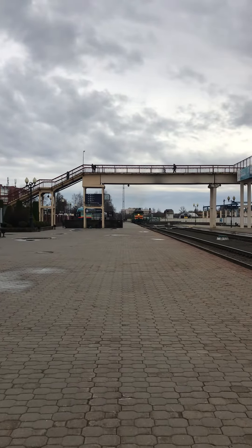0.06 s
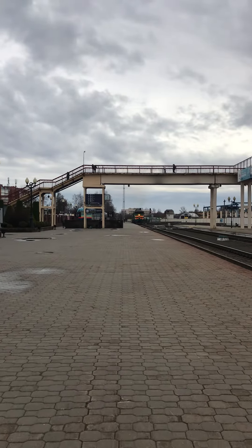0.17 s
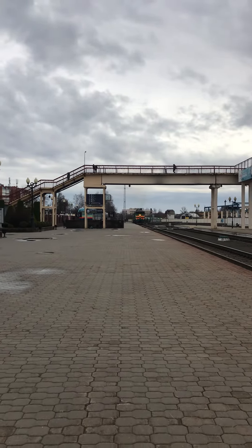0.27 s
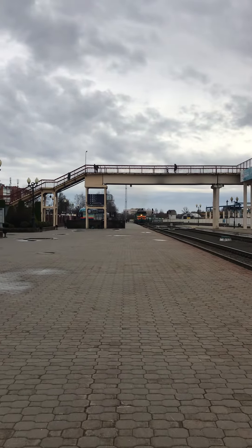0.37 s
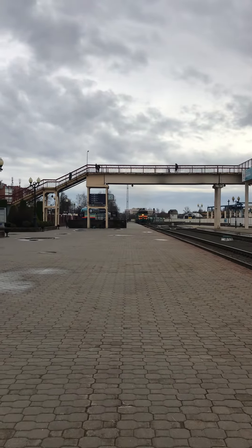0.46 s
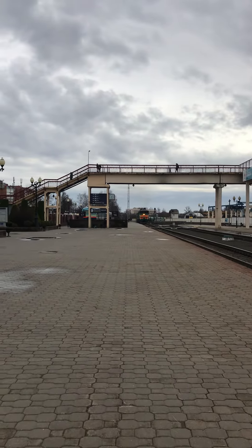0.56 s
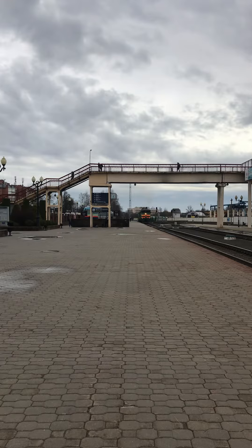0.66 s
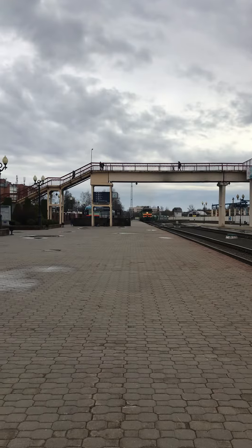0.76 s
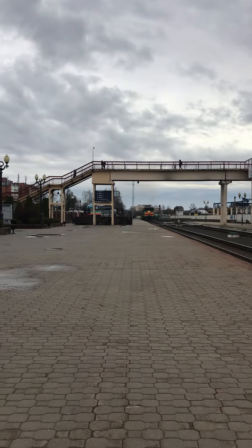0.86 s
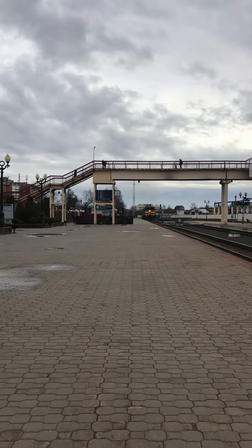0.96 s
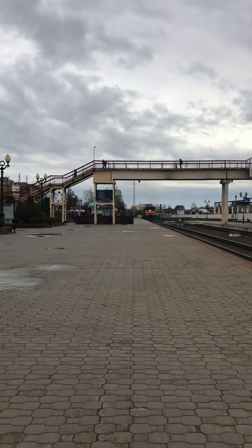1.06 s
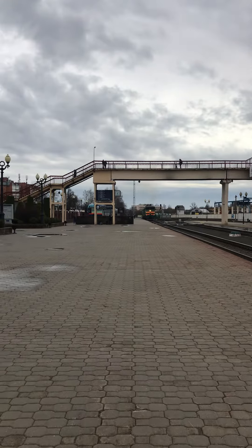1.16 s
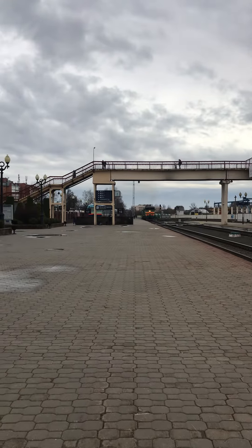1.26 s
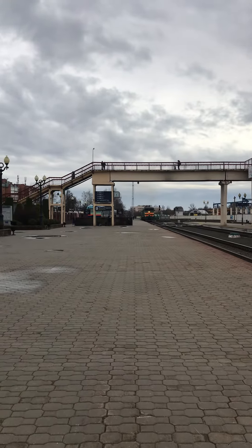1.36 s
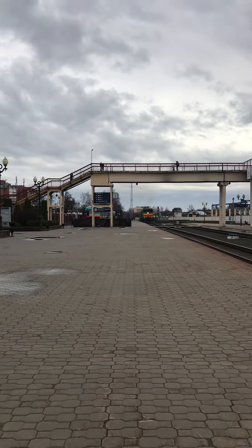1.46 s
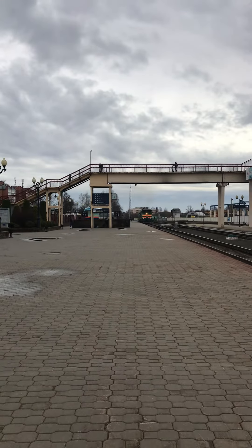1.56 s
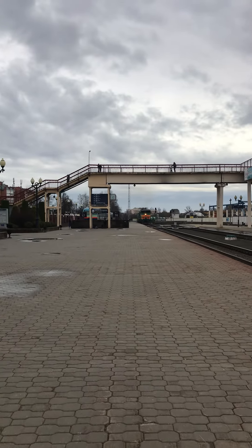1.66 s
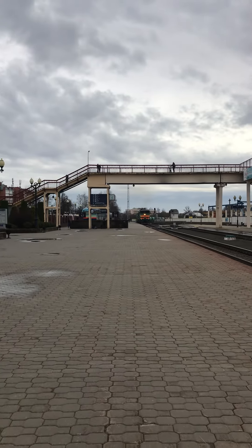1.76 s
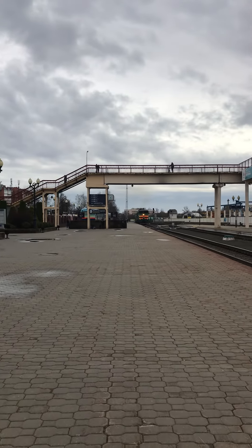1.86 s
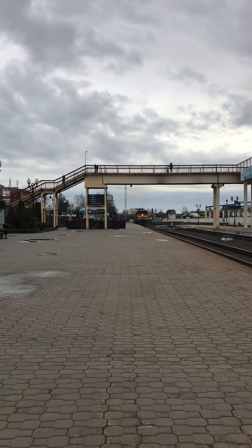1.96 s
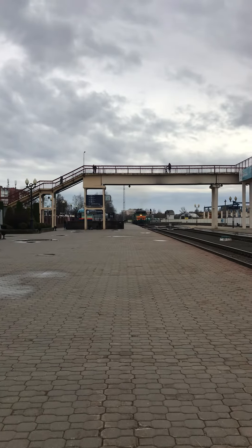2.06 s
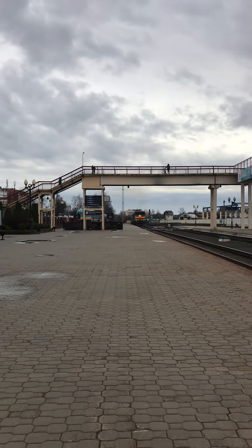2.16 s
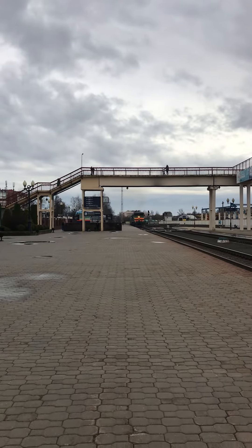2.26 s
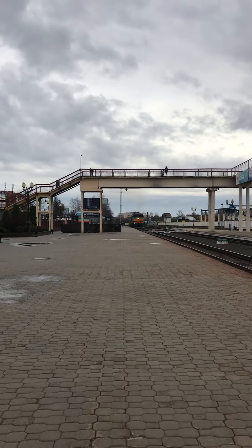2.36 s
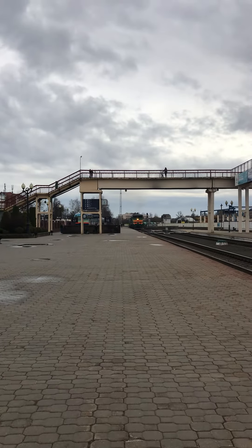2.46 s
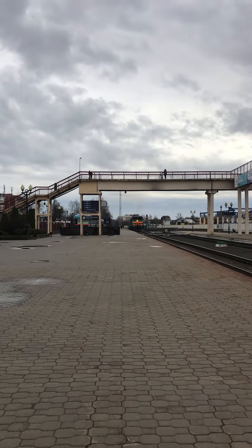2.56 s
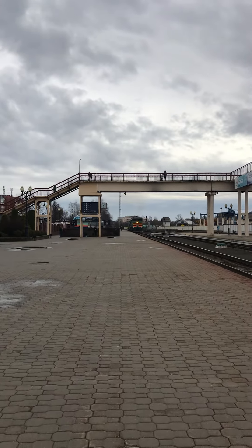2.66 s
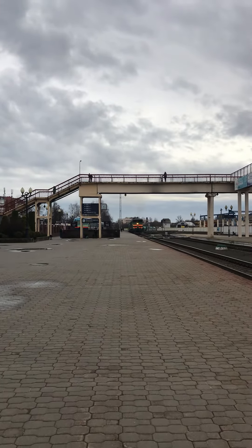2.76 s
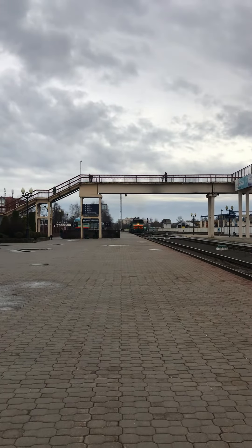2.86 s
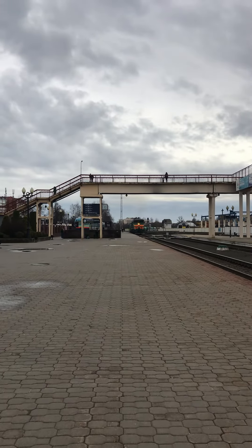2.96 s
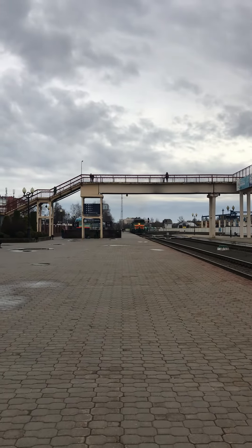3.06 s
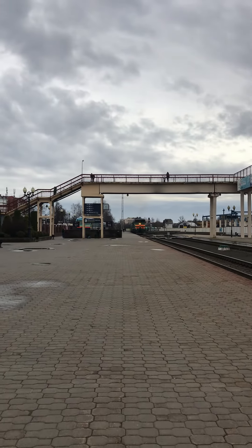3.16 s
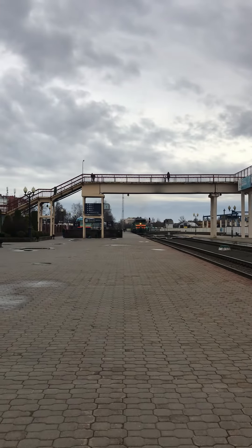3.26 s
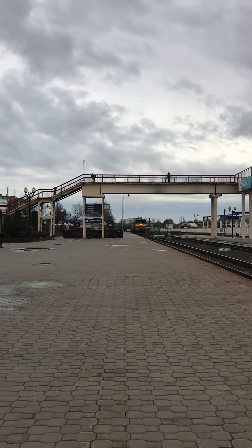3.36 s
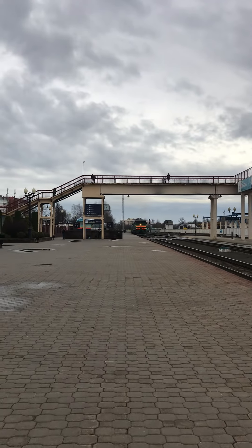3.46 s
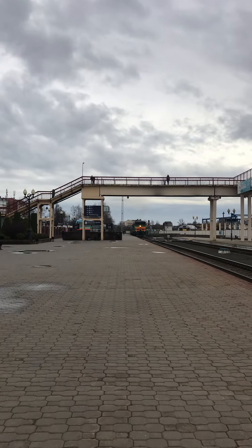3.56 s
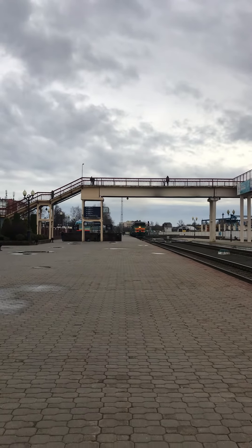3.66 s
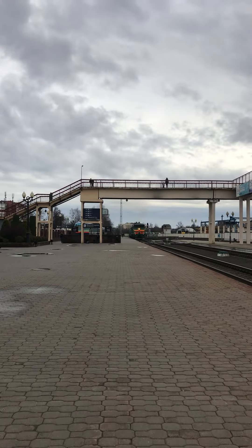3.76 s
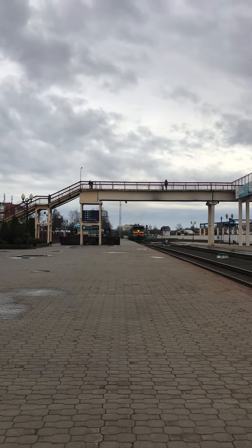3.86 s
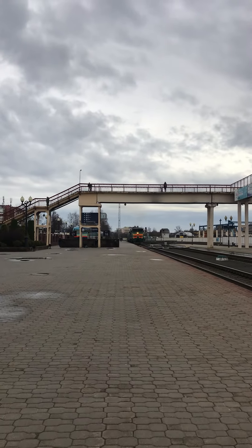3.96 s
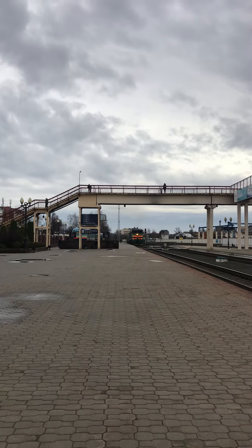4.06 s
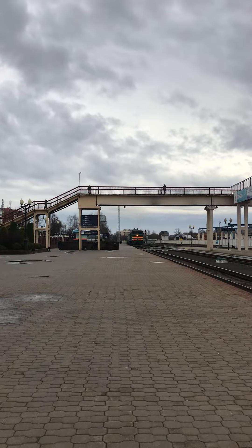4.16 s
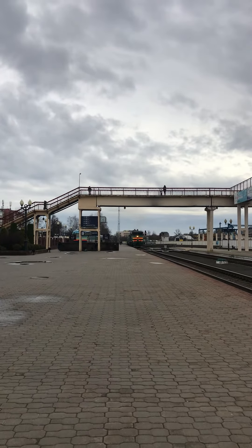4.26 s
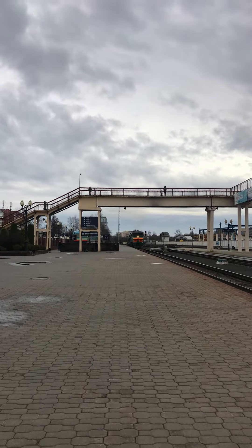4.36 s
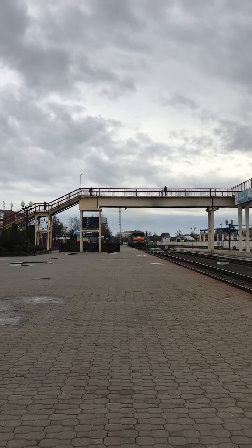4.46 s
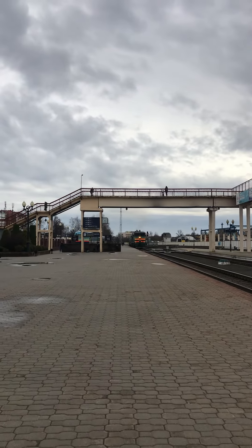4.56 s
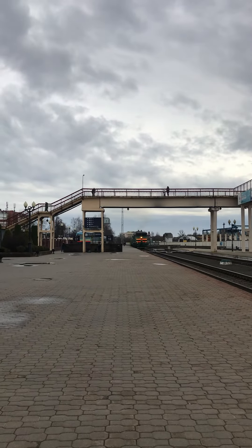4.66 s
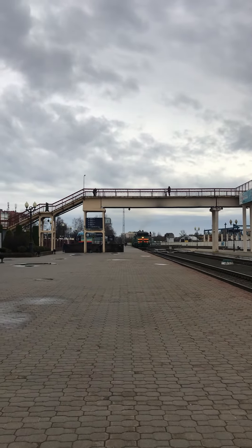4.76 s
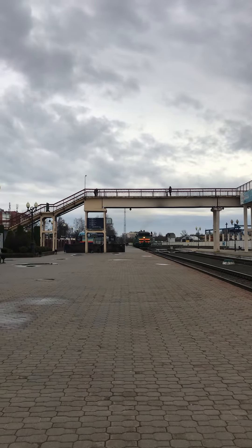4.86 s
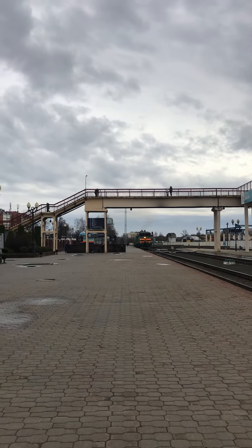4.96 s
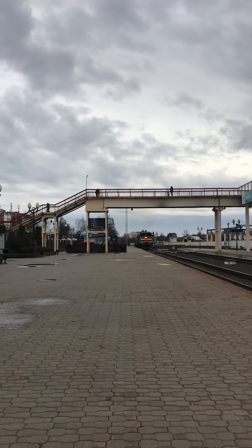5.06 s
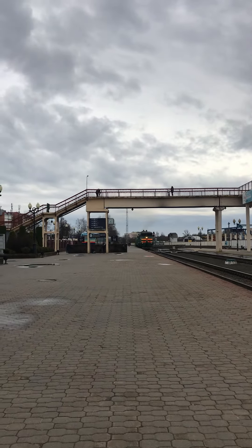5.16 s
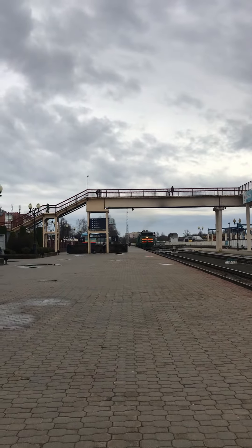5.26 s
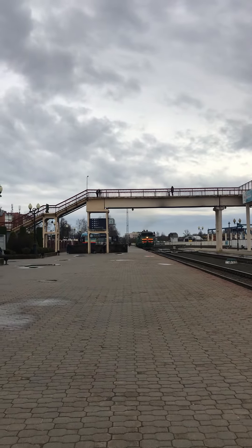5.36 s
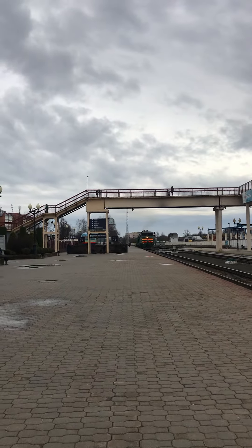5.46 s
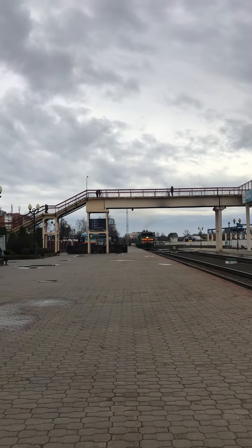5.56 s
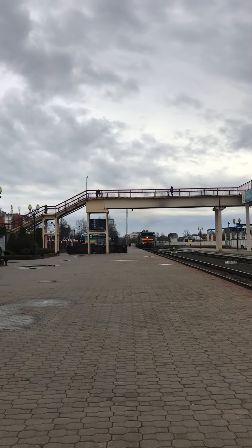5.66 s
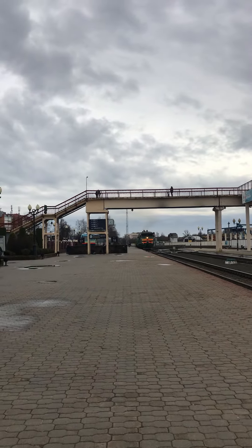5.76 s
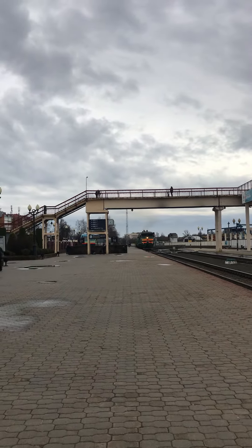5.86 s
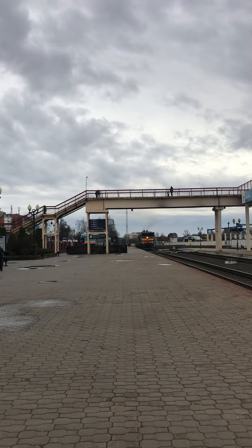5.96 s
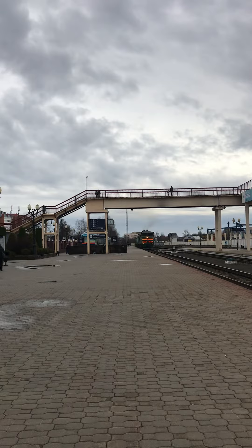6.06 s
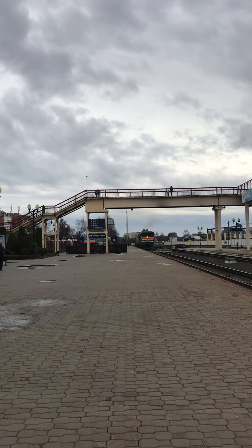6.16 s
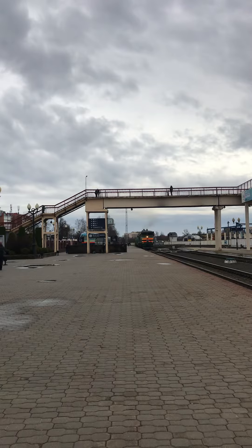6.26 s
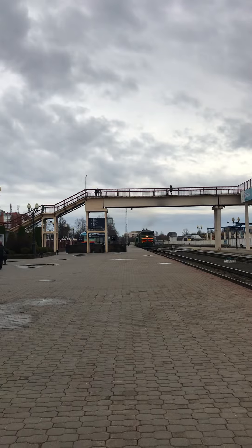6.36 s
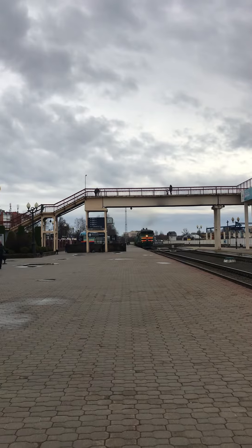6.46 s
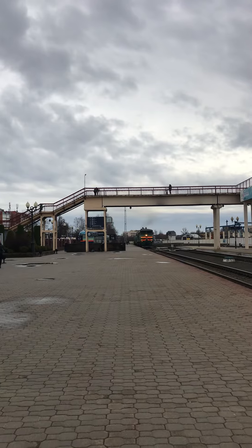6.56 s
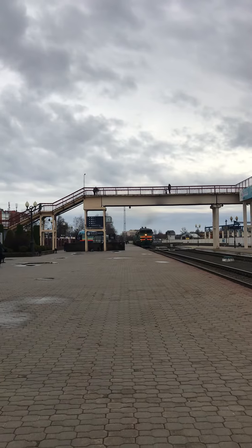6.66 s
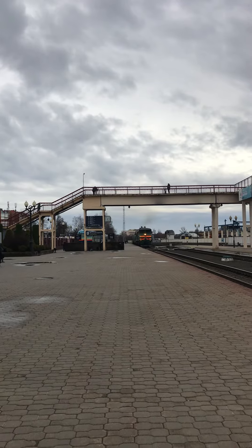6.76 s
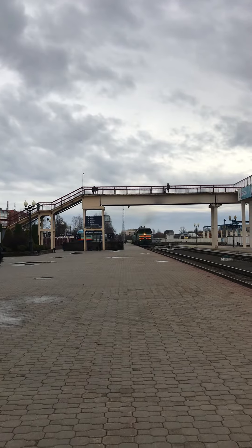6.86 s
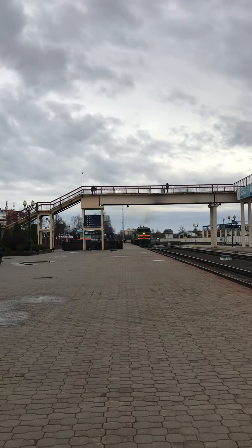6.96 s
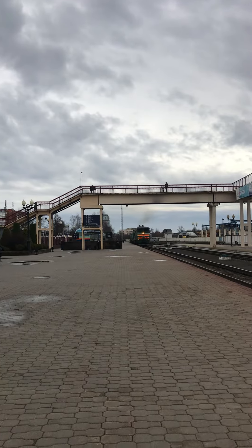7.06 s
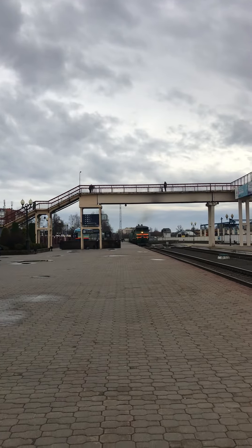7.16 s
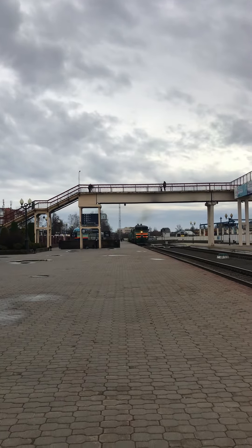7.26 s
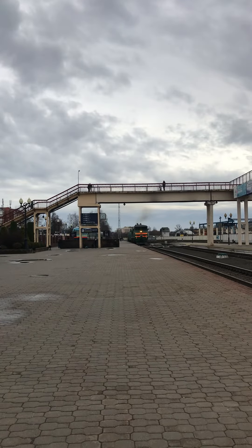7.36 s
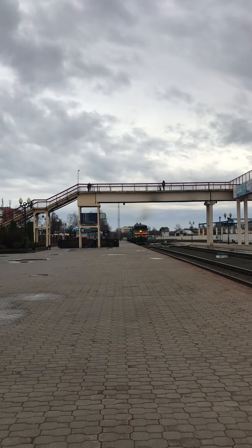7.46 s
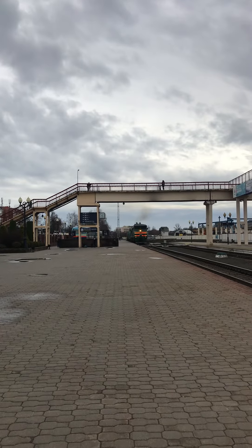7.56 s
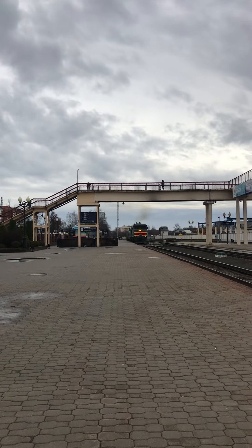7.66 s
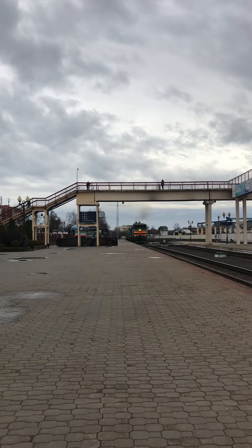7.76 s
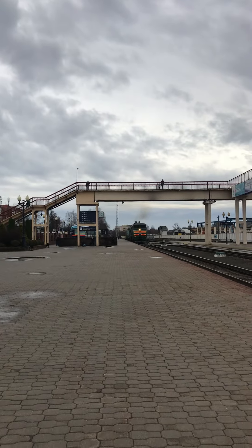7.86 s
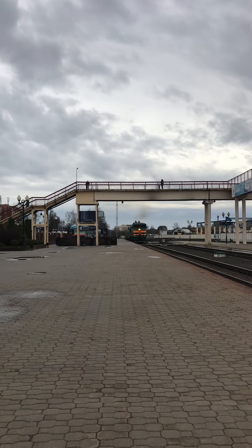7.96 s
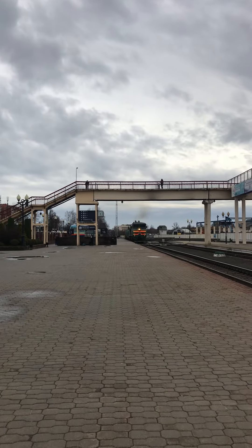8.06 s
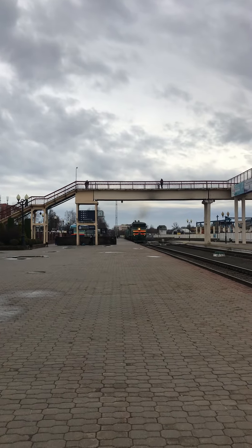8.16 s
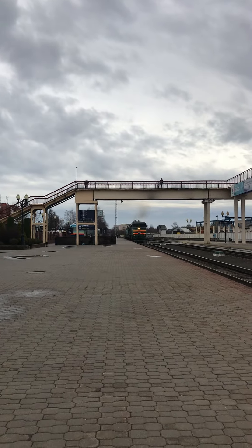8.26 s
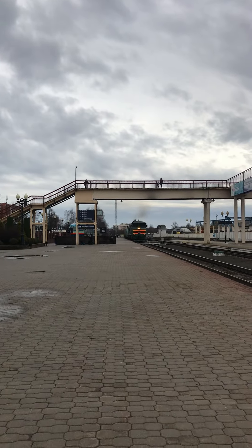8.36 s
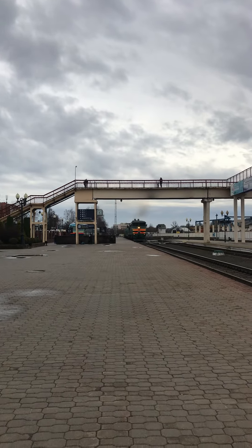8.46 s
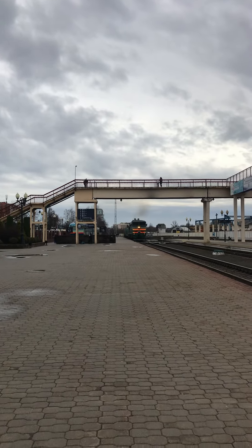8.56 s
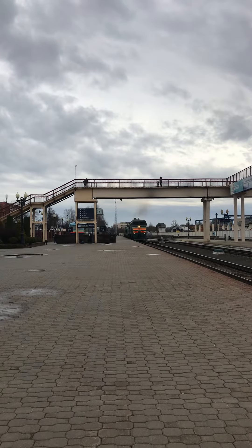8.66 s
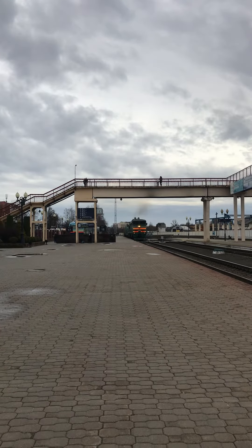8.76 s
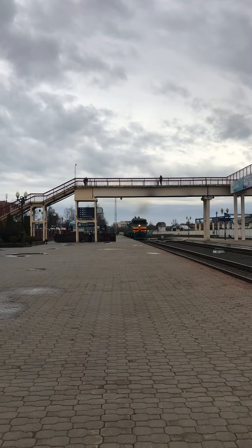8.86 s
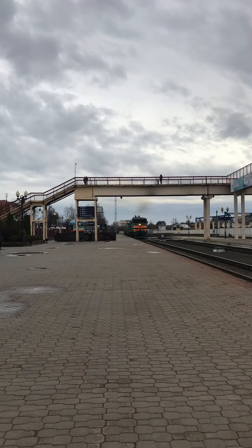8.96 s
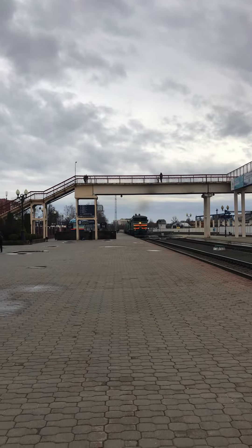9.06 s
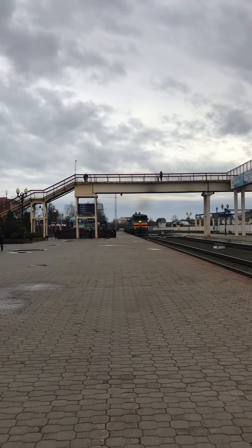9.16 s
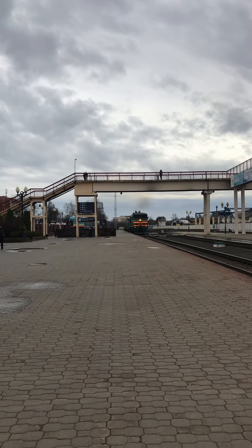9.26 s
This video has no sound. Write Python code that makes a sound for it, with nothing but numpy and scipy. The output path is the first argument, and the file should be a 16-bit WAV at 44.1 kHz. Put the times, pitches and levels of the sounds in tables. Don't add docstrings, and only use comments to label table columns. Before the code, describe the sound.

An open-air station platform, heard through a handheld phone microphone. From 0 s a distant diesel locomotive gives a deep, throbbing drone, two engines slightly out of step so the low rumble beats, beneath a soft broad roar of exhaust, fans and wheels. The rumble swells around 3 s and again near 6 s, and thin blower and gear whines slowly strengthen. Very close, coat fabric swishes, with small dry crackles early on, a longer shift around 2-3 s, and sharper crackles clustering from 3.6 to 6 s. At about 6.9 s a loud, brassy air horn enters: short blasts at 6.9-7.2 and 7.4-7.7, a longer one at 7.9-8.6, and a last from 8.8 to about 9.4 s. Its steady mid pitch shimmers, each blast leaving a quickly fading echo over the continuing engine roar and light cloth rubs.

```python
import sys
import numpy as np
from scipy import signal
from scipy.fft import rfft, irfft, next_fast_len
from scipy.io import wavfile
from scipy.ndimage import uniform_filter1d

SR = 44100
rng = np.random.default_rng(int(sys.argv[2]) if len(sys.argv) > 2 else 0)


def attenuation_scalar(level_db):
    decades = np.asarray(level_db, float) / 20
    return 10 ** decades


def store_wav(level_fs):
    pcm = np.round(np.clip(np.atleast_2d(level_fs), -1, 1) * 32767)
    wavfile.write(sys.argv[1], SR, pcm.T.astype(np.int16))


N = 410571
TIME = np.arange(N) / SR

# (frequency [Hz], level per Hz [dB])
ROAR_COLOUR = [(18, -60), (28, -29), (45, -17), (80, -6.5), (130, -16), (190, -12.5), (235, -26.5),
               (300, -19.5), (450, -30), (1360, -33.5), (2970, -40.5), (3900, -45), (4700, -52),
               (6000, -53.5), (8000, -65), (11000, -89)]
# (far level [dB], near level [dB]); the train sounds nearest from NEAR_S on
BASS_DB, MIDDLE_DB, TREBLE_DB = (-40, -30), (-43.3, -37.5), (-51.8, -44.8)
NEAR_S, HORN_DUCK_DB = 6.93, -2
# (middle [s], level [dB], half length [s])
RUMBLE_SURGES = [
    (3, 3.5, .5),
    (6, 2, 0.48),
    (6.8, -4.5, 0.38),
]

# (frequency [Hz], width [Hz], far level [dB], near level [dB])
WHINES = [(1353, 12, -60, -57), (3306, 130, -62, -56), (3450, 130, -65, -59), (5840, 800, -66, -59)]
# (far level [dB], near level [dB])
BLOWER_DB = (-69.5, -59)
BLOWER_HZ, BLOWER_WIDTH_HZ = 5200, 260
# (middle [s], level [dB], half length [s])
BLOWER_SWELLS = [
    (3.9, 4, .3),
    (4.9, 2.5, .6),
    (5.75, -6, .15),
    (6.1, 5, .25),
]

# (frequency [Hz], level [dB])
CLOTH_COLOUR = [(2940, -31), (5000, -3), (5830, -3), (6640, -6.5), (9200, -6), (10300, -6.5), (11400, -6.5),
                (12800, -8.5), (15100, -9.5), (15800, -6.5)]
# (time [s], peak level [dB], low band against high [dB], half length [s])
CREASES = [(0.0932, -42.5, -1, 0.0073), (0.3726, -47, 0.5, 0.0088), (0.4055, -47.5, 6, 0.008),
           (0.6235, -51, -8, 0.008), (0.9433, -46, -12, 0.0072), (1.068, -50, -8, 0.0065),
           (2.4634, -33, -12, 0.008), (3.0614, -43.5, -8, 0.008), (3.6077, -34.5, -15, 0.0073),
           (4.158, -30, -5, 0.0078), (4.756, -33.5, -1, 0.0075), (4.8688, -43.5, -8, 0.008),
           (4.9746, -38, -4, 0.008), (5.035, -42, 2, 0.0086), (5.0637, -37, 6, 0.0095),
           (5.241, -31, -19, 0.0022), (5.326, -30, -14, 0.0072), (5.828, -40, 6, 0.003),
           (5.835, -37, 13, 0.006), (5.8494, -36, -8, 0.0062), (5.8585, -33, -17, 0.001),
           (5.882, -30.5, -4, 0.0064), (5.893, -38, -15, 0.004), (4.844, -40, -15, .001),
           (6.0457, -37, -9, 0.008), (6.4896, -46, -3, 0.008), (6.6223, -45, -16, 0.008),
           (6.6947, -43, -4, 0.0071)]
# (time [s], peak level [dB], frequency [Hz])
SQUEAKS = [(2.8145, -51, 13200), (3.1128, -57, 13200), (3.1443, -60, 13200), (6.1804, -52, 13200)]
# (middle [s], level [dB], half length [s])
RUBS = [(.18, -67, 0.018), (0.716, -68, 0.033), (1.03, -68, .02), (1.17, -68, .03), (1.747, -63, .04),
        (1.86, -60, 0.045), (2.12, -63.5, 0.035), (2.62, -65, .05), (2.77, -63, 0.026), (2.898, -63, 0.027),
        (3.182, -63, 0.035), (3.422, -58, 0.024), (3.693, -65, 0.048), (4.27, -62, .02),
        (4.392, -60, 0.025), (4.549, -60, .04), (4.934, -63, .04), (5.084, -55, .03), (5.78, -61.5, 0.034),
        (6.523, -62, 0.026), (7.085, -43, .012), (7.205, -50, 0.01), (7.652, -41, .01), (7.767, -53, .02),
        (8.25, -52, .03), (8.378, -48, .015), (8.582, -57, .03), (8.848, -49, .015), (9.07, -54, .02)]
# (middle [s], level [dB], half length [s])
ARM_STIRS = [
    (.5, -3, .3),
    (2.4, 8.5, .7),
    (4.4, 2.5, .2),
    (4.96, 8, .15),
    (5.95, 8.5, 0.17),
    (6.9, 2, 0.54),
]
SWISH_DB, CREASE_LEAD_S = -67.5, 0.004

# (opens [s], shuts [s])
BLASTS = [
    (6.925, 7.21),
    (7.425, 7.72),
    (7.87, 8.6),
    (8.825, 9.4),
]
# (frequency [Hz], level [dB])
BELL_COLOUR = [(590, -15), (1000, -2), (1530, -4.5), (2240, -4.5), (2820, -4.5), (3400, -4.5),
               (4750, -14.5), (6330, -15.5), (7270, -21.5), (7970, -24.5), (12200, -31.5), (15800, -46)]
REED_HZ, REED_RISE_HZ_PER_S, SHUT_SAG_HZ, ATTACK_S = 364.1, 0.594, 2.5, 0.021
BLOW_DB, TAIL_DB_PER_S = (-21, -20.5, -26, -22.5), (70, 88, 44.3, 87.5)
YARD_DB, YARD_DB_PER_S = -15, 20
# (middle [s], level [dB], half length [s])
FIRST_MEETS = [(7.07, -2, 0.027), (7.38, -1, 0.02), (7.57, 4.5, .06), (7.71, -10, 0.014), (7.77, 6, 0.017),
               (7.84, -8, .03), (7.95, 3.5, 0.065), (8.2, 1.5, .06), (8.52, -8.5, 0.013), (8.7, -12, 0.017),
               (8.8, 4, .04), (8.9, -11, 0.013), (9.03, -12.5, 0.042), (9.24, 2, 0.036)]
# (middle [s], level [dB], half length [s])
SECOND_MEETS = [(7.05, 2.5, .15), (7.26, -14, .04), (7.65, 5.5, 0.018), (7.82, -9, 0.017), (7.97, -5, 0.1),
                (8.11, -10, 0.025), (8.33, -6.5, 0.054), (8.5, 6.5, 0.034), (8.79, 5, .04),
                (8.92, 4.5, 0.09), (9.21, 4.5, 0.05), (9.29, -8, 0.062)]
# (middle [s], level [dB], half length [s])
THIRD_MEETS = [(6.94, -4, .04), (7.02, -4, 0.079), (7.16, -7, .02), (7.21, 1.5, 0.024), (7.67, 5, .07),
               (7.89, -6.5, 0.027), (8.01, 6.5, 0.019), (8.15, -3.5, .1), (8.35, -8, 0.022), (8.51, 7, .04),
               (8.57, -8, 0.024), (8.81, -3, .02), (8.97, 5.5, 0.033), (9.13, 5, .05)]
# (middle [s], level [dB], half length [s])
UPPER_MEETS = [(7.06, 1, 0.019), (7.62, 2.5, 0.085), (8.0, 2.5, 0.033), (8.1, -2.5, 0.036),
               (8.24, 2.5, 0.072), (8.34, -4, 0.031), (9.04, -4.5, 0.05)]
# (middle [s], level per partial [dB], half length [s])
EDDIES = [
    (7.95, -.1, .1),
    (8.3, -.05, .3),
    (9.05, .08, .15),
    (9.3, -.15, .07),
]

# (time [s], front shaft [Hz], its exhaust boom [dB], rear shaft [Hz], its exhaust boom [dB])
ENGINES = [(0.0, 10.558, -24, 10.943, -16), (0.665, 10.565, -20, 11.033, -39),
           (1.33, 10.625, -25, 11.005, -39), (1.995, 10.632, -24.5, 10.948, -25.5),
           (2.66, 10.582, -20.0, 10.911, -28), (3.325, 10.58, -19, 10.834, -26.5),
           (3.99, 10.68, -27.5, 10.941, -20.5), (4.655, 10.652, -27.5, 10.987, -22.2),
           (5.32, 10.652, -19.6, 10.991, -27), (5.985, 10.79, -26, 11.209, -21),
           (6.65, 10.903, -45, 11.362, -25.5), (7.315, 10.954, -25, 11.417, -23),
           (7.98, 11.023, -28.5, 11.533, -30), (8.645, 11.055, -23, 11.47, -26.5),
           (9.31, 11.002, -26.5, 11.352, -24.5)]
BOOM_ORDER, REAR_LAG_TURNS = 7, 0.699 / 7
# (order [per turn], front far [dB], front near [dB], rear far [dB], rear near [dB])
SHAFT_ORDERS = [(3, -51, -57, -59, -60), (4, -53, -52, -70, -48), (5, -48, -59, -49.5, -42),
                (6, -41, -39, -47, -49.5), (8, -48, -50, -50, -49), (9, -63, -48, -55.5, -50),
                (10, -36, -30.5, -36.5, -34.5), (11, -41, -47, -37.5, -36),
                (12, -42.5, -35.5, -42.5, -38.5), (13, -42.5, -34, -39.5, -50),
                (14, -37, -32.5, -49, -36.5), (15, -53, -35, -51.5, -44.5), (16, -31, -30.5, -41, -36),
                (17, -34, -36, -46, -47), (19, -51.5, -49.5, -51, -51), (20, -50, -46, -52, -49),
                (23, -55.5, -45, -56, -51), (24, -55.5, -54, -47.5, -44)]
# (middle [s], level [dB], half length [s])
TENTH_SWELLS = [(.12, 8, .1), (.7, -9, 0.31), (1.5, 4.5, .3), (2.07, -10, 0.22), (3.8, -8, .25),
                (6.4, 5.5, 0.8), (7.07, -7, .08), (7.77, -7, .1), (8.6, 6, 0.43)]
# (middle [s], level [dB], half length [s])
SIXTEENTH_SWELLS = [(.22, -12, 0.37), (3.3, 3, .4), (4.12, -5, 0.053), (5.3, 4.5, 0.36), (7.15, -6.5, .12),
                    (8.13, -2, 0.088), (8.45, 5.5, 0.19), (9.1, 4, 0.25)]

PORT_NOTCH_HZ, PORT_NOTCH_WIDTH_HZ, TOP_HZ = 10460, 1900, 15800


def unit(x):
    return x / np.sqrt(np.mean(np.abs(x) ** 2))


def columns(table, time=TIME):
    s, *values = np.transpose(table)
    return [np.interp(time, s, v) for v in values]


def colour_gain(colour, hz):
    colour_hz, colour_db = np.transpose(colour)
    return attenuation_scalar(np.interp(np.log(hz), np.log(colour_hz), colour_db))


def walk(rate, size=N, step=1):
    hold = max(int(SR / step / rate), 1)
    held = np.repeat(rng.standard_normal(size // hold + 1), hold)
    return unit(uniform_filter1d(uniform_filter1d(held, hold), hold)[:size])


def noise(colour, lo_hz, hi_hz, source=None):
    if source is None:
        source = rng.standard_normal(N)
    size = next_fast_len(N)
    hz = np.arange(1, size // 2 + 2) * SR / size
    edges = np.sqrt(1 / (1 + (lo_hz / hz) ** 8) - 1 / (1 + (hi_hz / hz) ** 8))
    return irfft(rfft(source, size) * colour_gain(colour, hz) * edges, size)[:N]


def narrow(phase, width_hz):
    return walk(width_hz) * np.cos(phase) + walk(width_hz) * np.sin(phase)


def swells(rows, time=TIME):
    return sum(db * np.exp(-((time - s) / half) ** 2) for s, db, half in rows)


def nearing(far_db, near_db):
    return far_db + (near_db - far_db) * np.minimum(TIME / NEAR_S, 1)


def blowing(time, tail_db_per_s):
    power = 1e-9
    for opens, shuts in BLASTS:
        build = 1 - np.exp(-np.maximum(time - opens + .012, 0) / ATTACK_S)
        since_shut = np.maximum(time - shuts, 0)
        echoes = attenuation_scalar(-tail_db_per_s * since_shut) ** 2
        yard = attenuation_scalar(YARD_DB) ** 2 * attenuation_scalar(-YARD_DB_PER_S * since_shut) ** 2
        power = power + build ** 2 * (echoes + yard)
    return 10 * np.log10(np.minimum(power, 1))


def roar():
    duck_db = HORN_DUCK_DB * attenuation_scalar(blowing(TIME, tail_db_per_s=90))
    bass_db = nearing(*BASS_DB) + swells(RUMBLE_SURGES)
    middle_db = nearing(*MIDDLE_DB) + duck_db
    treble_db = nearing(*TREBLE_DB) + 2 * duck_db
    bass = attenuation_scalar(bass_db + 1.3 * walk(6)) * unit(noise(ROAR_COLOUR, 15, 255))
    middle = attenuation_scalar(middle_db + .6 * walk(7)) * unit(noise(ROAR_COLOUR, 225, 1600))
    treble = attenuation_scalar(treble_db + .6 * walk(9)) * unit(noise(ROAR_COLOUR, 1690, 9500))
    return bass + middle + treble


def whines():
    speed = uniform_filter1d(columns(ENGINES)[0], SR)
    phase = 2 * np.pi * np.cumsum((speed / speed[0]) ** .3) / SR
    blower_db = nearing(*BLOWER_DB) + swells(BLOWER_SWELLS) + 1.5 + 1.4 * walk(12)
    out = attenuation_scalar(blower_db) * narrow(BLOWER_HZ * phase, BLOWER_WIDTH_HZ)
    for hz, width_hz, far_db, near_db in WHINES:
        level_db = far_db + (near_db - far_db) * TIME / 7 + 1.3 * walk(4)
        out = out + attenuation_scalar(level_db) * narrow(hz * phase, width_hz)
    return out


def cloth():
    catches = rng.random(N) < .03
    grain_db = np.minimum(3.0 * rng.exponential(size=N), 12)
    grain = rng.standard_normal(N) * attenuation_scalar(grain_db * catches)
    rubbing = attenuation_scalar(SWISH_DB + swells(ARM_STIRS))
    for s, db, half in RUBS:
        rubbing = rubbing + attenuation_scalar(db) * np.exp(-((TIME - s) / half) ** 2)
    out = rubbing * attenuation_scalar(0.94 * walk(25)) * unit(noise(CLOTH_COLOUR, 5500, 17000, grain))

    high = unit(noise(CLOTH_COLOUR, 6000, 17000))
    low = unit(noise([(2500, -1.5), (4500, 1.0), (7000, -7)], 2700, 5700))
    crackle = attenuation_scalar(5.5 * walk(900))
    for s, peak_db, low_db, half in CREASES:
        age = np.arange(-int(2 * half * SR), int(2 * half * SR)) / SR
        start = int((s + CREASE_LEAD_S - 2 * half) * SR)
        at = slice(start, start + len(age))
        bend = np.exp(-(age / half) ** 2)
        burst = attenuation_scalar(peak_db - 10.5) * unit(bend * crackle[at]) * np.sqrt(np.mean(bend ** 2))
        out[at] += burst * (high[at] + attenuation_scalar(low_db - 3.5) * low[at])

    age = np.arange(int(.012 * SR)) / SR
    for s, peak_db, hz in SQUEAKS:
        squeak = np.hanning(len(age)) * np.sin(2 * np.pi * hz * age)
        out[int(s * SR):][:len(age)] += attenuation_scalar(peak_db) * squeak
    return out


def horn():
    first_open = BLASTS[0][0]
    time = TIME[int((first_open - .025) * SR):]
    size = len(time)
    meets = FIRST_MEETS, SECOND_MEETS, THIRD_MEETS, UPPER_MEETS
    first_db, second_db, third_db, upper_db = (db + blowing(time, tail) + swells(rows, time)
                                               for db, tail, rows in zip(BLOW_DB, TAIL_DB_PER_S, meets))
    is_open = sum((time > a) * (time < b) * 1. for a, b in BLASTS)
    valve = uniform_filter1d(is_open, int(0.05 * SR))
    sag_hz = SHUT_SAG_HZ * (1 - uniform_filter1d(valve, SR // 9))
    reed_hz = REED_HZ + REED_RISE_HZ_PER_S * (time - 8) - sag_hz + .8 * walk(6, size)
    phase = 2 * np.pi * np.cumsum(reed_hz) / SR
    rate = 1 / (.1 * SR)
    linger = np.maximum(valve, signal.lfilter([rate], [1, rate - 1], valve))
    wet = 1 - valve * (1 - .4 * np.clip((time - first_open) / .16, .1, 1))

    out = attenuation_scalar(first_db) * np.cos(phase + 0.75 * walk(12, size))
    out = out + attenuation_scalar(second_db) * np.cos(2 * phase + .5 * walk(13, size))
    order = np.arange(3, 44)
    bell = colour_gain(BELL_COLOUR, order * reed_hz.mean())
    groups = np.zeros((2, size))
    patch_db = walk(11, size)
    wobble = .04 * walk(30, size)
    weak_db = np.clip(upper_db - upper_db.max(), -9, 0)
    dull_db = 0.021 * weak_db + 0.064 * (time - 8) + swells(EDDIES, time)
    for k, gain in zip(order, bell):
        blur_hz = 30 + 4 * k + .12 * k ** 2
        far = walk(3 * blur_hz, size) + 1j * walk(3 * blur_hz, size)
        far = far * np.exp(-2j * np.pi * 7.5 * k * time)
        echo = (walk(blur_hz, size) + 1j * walk(blur_hz, size)) / np.sqrt(2)
        echo = echo * np.exp(-2j * np.pi * 3.2 * k * time) + attenuation_scalar(-12.5 - .2 * k) * far
        patch_db = .5 * patch_db + .87 * walk(9 + .7 * k, size)
        slip = 0.1534 * k ** 1.5 + k * wobble + .65 * walk(21.98, size)
        direct = attenuation_scalar(4.2 * patch_db) * np.exp(1j * slip)
        echo_loss = attenuation_scalar(-.2 * k - .1 * k * (1.2 - linger))
        path = np.sqrt(1 - wet) * direct + np.sqrt(wet) * echo * echo_loss
        groups[int(k > 4)] += gain * attenuation_scalar(k * dull_db) * np.real(path * np.exp(1j * k * phase))
    steady = groups / np.sqrt(2 * uniform_filter1d(groups ** 2, SR // 20))
    out = out + attenuation_scalar(third_db) * steady[0] + attenuation_scalar(upper_db) * steady[1]
    air = unit(noise(BELL_COLOUR, 820, 8500))[:size] * attenuation_scalar(upper_db - 34)
    rise = np.clip((time - first_open) / 0.01 + 1, 0, 1)
    return np.pad((np.sqrt(2) * out + air) * rise, (N - size, 0))


def engines():
    step = 16
    time = TIME[::step]
    size = len(time)
    front_hz, front_db, rear_hz, rear_db = columns(ENGINES, time)
    tenth_db, sixteenth_db = swells(TENTH_SWELLS, time), swells(SIXTEENTH_SWELLS, time)
    order_swells_db = {10: tenth_db, 16: sixteenth_db, 17: sixteenth_db}
    near = np.clip((time - 3.5) / 4.54, 0, 1)
    out = 0
    for which, (hz, boom_db) in enumerate([(front_hz, front_db), (rear_hz, rear_db)]):
        turns = np.cumsum(hz) * step / SR - which * REAR_LAG_TURNS
        out = out + attenuation_scalar(boom_db) * np.cos(2 * np.pi * BOOM_ORDER * turns)
        turns = np.cumsum(uniform_filter1d(hz, SR // step)) * step / SR
        for row in SHAFT_ORDERS:
            order = int(round(row[0]))
            far_db, near_db = row[1 + 2 * which:3 + 2 * which]
            fade_db = 2.5 * walk(2.486, size, step) + order_swells_db.get(order, 0)
            slip = 2 * np.pi * rng.random() + 0.4 * walk(2.5, size, step)
            level_db = far_db + near * (near_db - far_db) + fade_db
            out = out + attenuation_scalar(level_db) * np.cos(2 * np.pi * order * turns + slip)
    return np.sqrt(2) * signal.resample_poly(out, step, 1)[:N]


def scene():
    return (roar() + whines() + cloth() + horn() + engines())[None]


def low_pass(x):
    return signal.sosfilt(signal.butter(12, 15900, fs=SR, output="sos"), x)


def record(dry):
    port_band = signal.iirpeak(PORT_NOTCH_HZ, PORT_NOTCH_HZ / PORT_NOTCH_WIDTH_HZ, SR)
    port = signal.lfilter(*port_band, dry)
    bass = signal.sosfiltfilt(signal.butter(2, 200, fs=SR, output="sos"), dry)
    settling = np.exp(-(TIME / 0.066) ** 4)
    sound = dry - 0.52 * port - 0.77 * bass * settling
    rounded = np.tanh(1.1 * sound) / 1.1
    top_cut = signal.ellip(8, .2, 60, TOP_HZ, fs=SR, output="sos")
    return low_pass(signal.sosfilt(top_cut, rounded))


dry = scene()
out = record(dry)
store_wav(out)
```